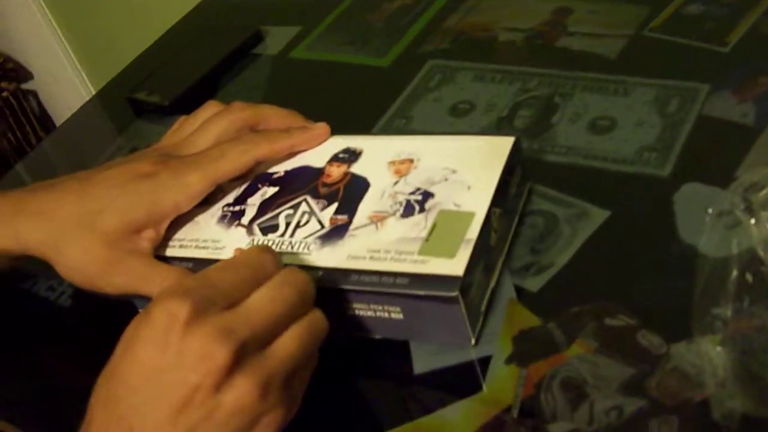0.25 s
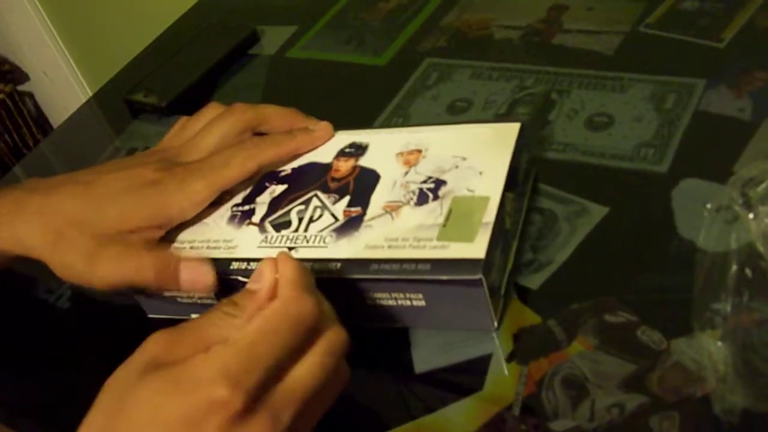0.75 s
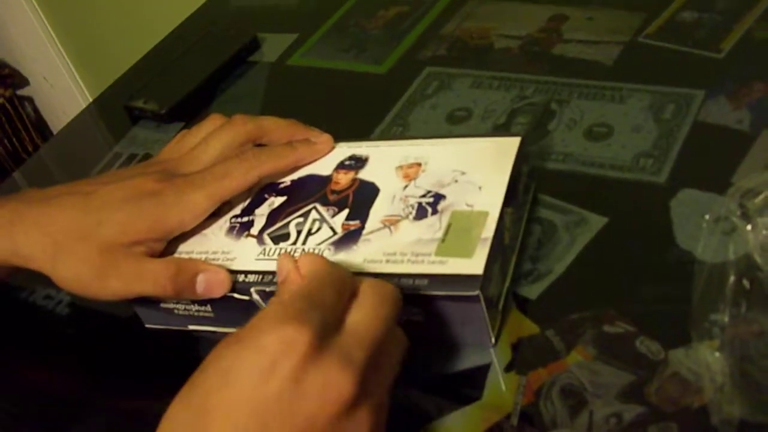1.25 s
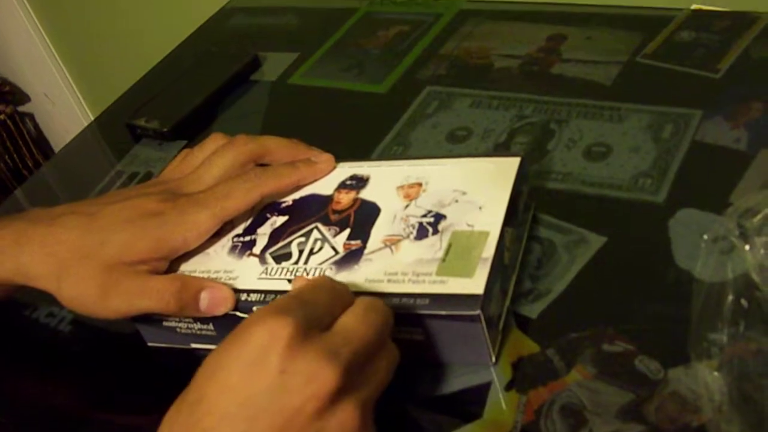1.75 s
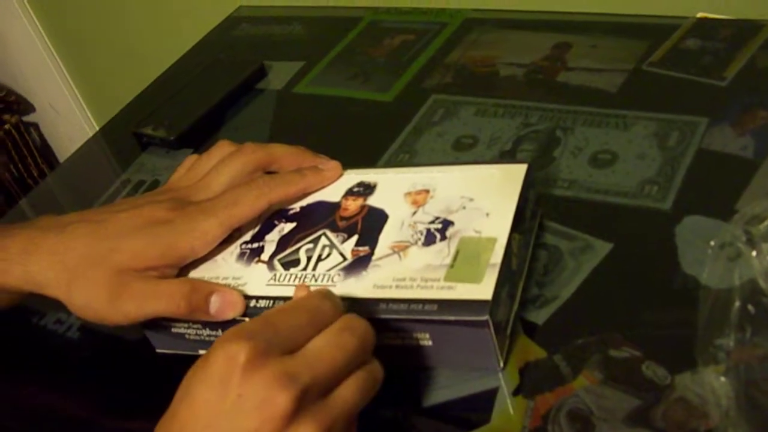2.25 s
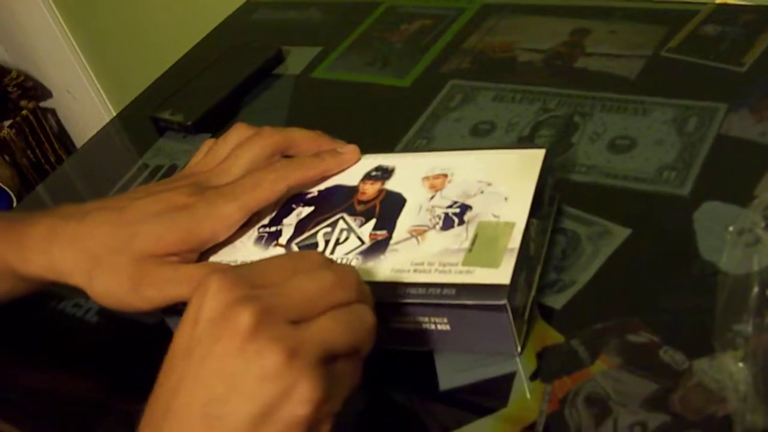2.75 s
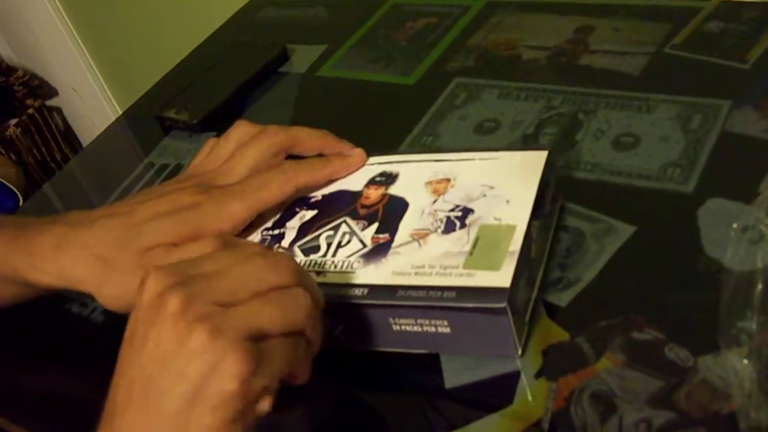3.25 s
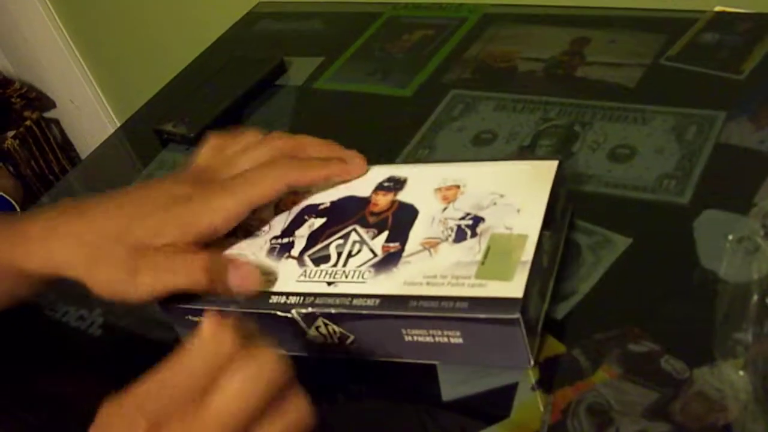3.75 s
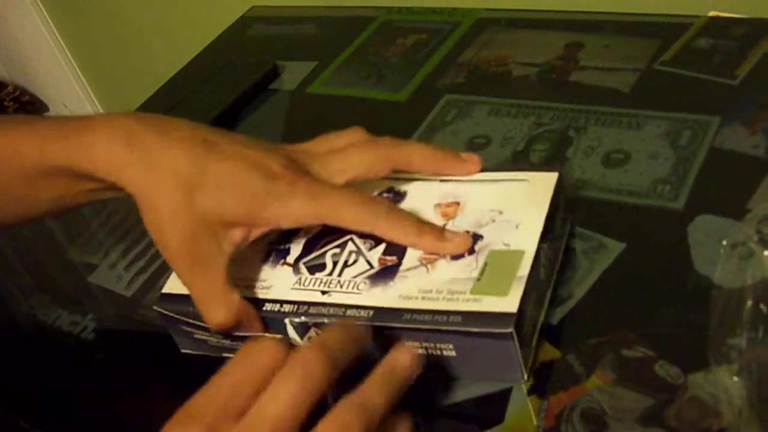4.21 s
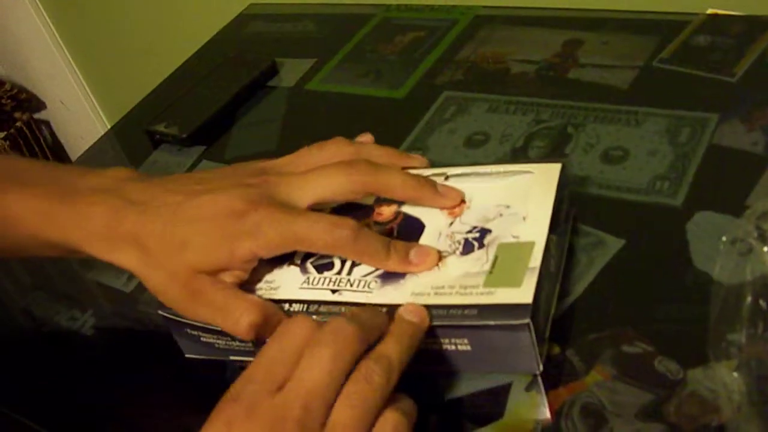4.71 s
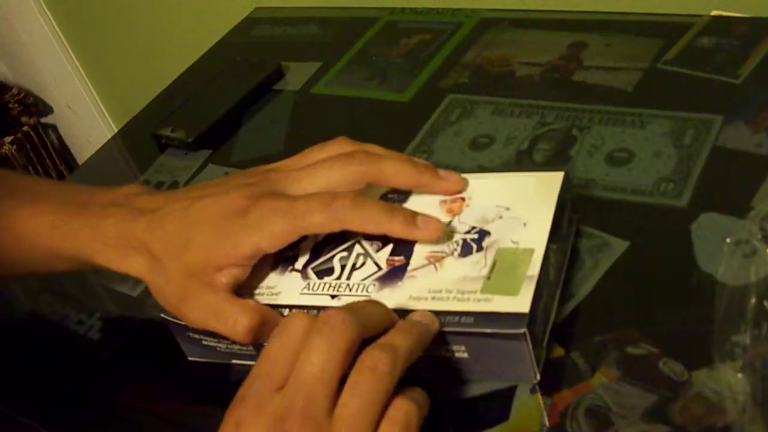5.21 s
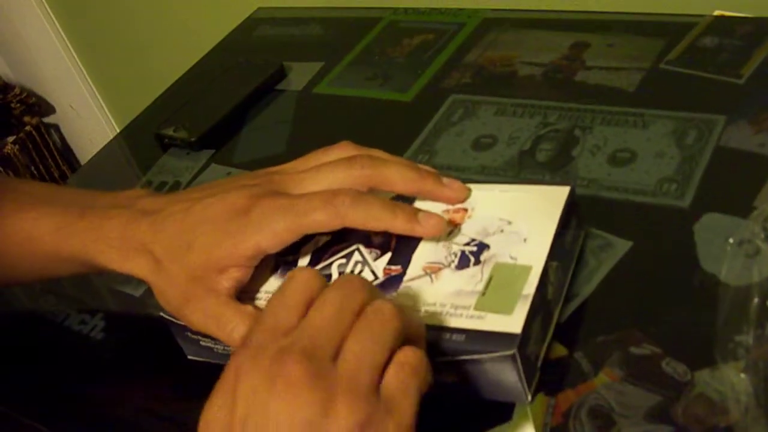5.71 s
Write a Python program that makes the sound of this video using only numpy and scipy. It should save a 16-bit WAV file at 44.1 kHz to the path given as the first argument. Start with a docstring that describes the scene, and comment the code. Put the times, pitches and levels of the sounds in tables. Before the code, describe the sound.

Fingernails pick at a sealed cardboard box in sharp, hollow clicks and short scrapes, with pauses and faint background hiss.

```python
"""A house murmurs under a camera's hiss and two thin whistles. Close by, fingernails pick at the sealed
edge of a small cardboard box, ringing its hollow panels and the table; a small room answers. The first tap
(0.2 s) is trailed by a short low tone, then a hard flick, rubbing fingers and thinning ticks. After a lull
the rubbing returns (2.4 s) and the picking builds to sharp flicks at 3.4 and 4.5 s, then eases into light
ticks and strokes."""
import sys
import numpy as np
from scipy import signal
from scipy.fft import rfft, irfft, next_fast_len
from scipy.io import wavfile
from scipy.ndimage import map_coordinates

SR = 44100
rng = np.random.default_rng(int(sys.argv[2]) if len(sys.argv) > 2 else 0)


def dump(signal):
    """Clip the signal to [-1, 1] and save it as 16-bit WAV at the path in sys.argv[1]."""
    limited = np.clip(np.atleast_2d(signal).T, -1, 1)
    pcm = np.round(limited * 32767).astype(np.int16)
    wavfile.write(sys.argv[1], SR, pcm)


N = 263354


def amp(db):
    return 10 ** (np.asarray(db) / 20)


def unit_rms(x):
    return x / np.sqrt(np.mean(x ** 2) + 1e-20)


def curve(points, hz):
    """Read (frequency, value) breakpoints on a log frequency axis."""
    freqs, values = np.transpose(points)
    return np.interp(np.log(hz + 1), np.log(freqs + 1), values)


def wobble(rate):
    """A smooth random modulator, rate knots a second."""
    return map_coordinates(rng.standard_normal(int(N * rate / SR) + 4), [np.arange(N) * rate / SR])


def filtered(x, response):
    """Pass x through a complex frequency response."""
    size = next_fast_len(x.shape[-1] + SR // 10)
    return irfft(rfft(x, size) * response(np.fft.rfftfreq(size, 1 / SR)), size)[..., :x.shape[-1]]


def resonators(modes, hz):
    """The response of parallel band-pass resonances, alternating in polarity."""
    return sum((-1) ** k * amp(db) * 1j * hz * width / (centre ** 2 - hz ** 2 + 1j * hz * width)
               for k, (centre, width, db) in enumerate(modes))


def stereo(x, correlation):
    """Mix two unrelated signals as mid and side to set the width at each frequency."""
    angle = lambda hz: np.arccos(np.clip(curve(correlation, hz), -1, 1)) / 2
    mid, side = filtered(x, lambda hz: np.array([np.cos(angle(hz)), np.sin(angle(hz))]))
    return np.array([mid + side, mid - side])


# Colour of the house murmur and camera hiss: (frequency [Hz], relative level [dB])
BED_SPECTRUM = [(12, -45), (20, -9), (55, -1.5), (87, -13.5), (103, -11), (257, -15), (331, -16.5),
                (448, -19), (761, -22), (821, -22), (1030, -25), (2430, -29.5), (8400, -42), (10900, -62.5),
                (18500, -120)]
# Stereo width of the bed: (frequency [Hz], left-right correlation [-1..1])
BED_CORRELATION = [(60, 0.52), (160, 0.11), (440, 0.3), (1180, 0.14), (3170, -0.14), (8560, 0.21)]
# Balance of the bed: (frequency [Hz], left minus right [dB])
BED_PAN = [(60, -0.5), (160, 0), (440, 0.0), (1180, 0.5), (3170, 0.5), (8560, 3)]
def noise_bed(level_db=-54.5, drift_db=0.26):
    """The low murmur of the house and the camera's hiss: smooth noise whose level drifts a little."""
    colour = lambda hz: amp(curve(BED_SPECTRUM, hz) + np.outer([.5, -.5], curve(BED_PAN, hz)))
    noise = filtered(stereo(rng.standard_normal((2, N)), BED_CORRELATION), colour)
    return amp(level_db + drift_db * wobble(6.5)) * unit_rms(noise)


# The camera's own tones: (pitch [Hz], rms level [dB])
WHISTLES = [(7827, -86), (8172, -91)]
def camera_whistles():
    """Two thin, steady sines from the camera."""
    return sum(np.sqrt(2) * amp(db) * np.sin(2 * np.pi * hz * np.arange(N) / SR) for hz, db in WHISTLES)


# Nail hits: (time [s], knock [dB], thud [dB], ring [dB], crack [dB],
#             knock pitch [Hz], ring pitch [Hz], blip against the ringing [dB])
NAIL_HITS = [(0.2165, -28.5, -36, -35.5, -57, 483, 1400, -6), (0.347, -67, -71, -59, -45, 440, 1670, -11),
             (0.3529, -68, -54, -53, -40, 513, 1660, -11),
             (0.3916, -19.5, -21.5, -17.5, -24.5, 655, 1470, -10),
             (0.3952, -9, -28, -9, -42, 623, 1090, 3.5), (0.4327, -45, -37, -21, -56, 700, 1970, -6),
             (0.4613, -21, -35.5, -46, -41, 518, 1410, -3.5),
             (0.6108, -58, -72, -48, -44.5, 500, 1430, -14), (0.7327, -49, -74, -46, -60, 650, 1580, -4),
             (0.7948, -45, -67, -45.5, -47, 546, 1470, -6),
             (0.8335, -46.5, -52, -49.5, -51, 545, 1100, -11.5),
             (0.9029, -43.5, -46, -36.5, -44, 636, 1340, -7.5), (1.0917, -39, -69, -68, -66, 404, 1440, -9),
             (1.3425, -40.5, -63, -37, -75, 620, 1250, -11.5), (1.719, -76, -80, -68, -50, 700, 1680, -3),
             (2.7892, -20.5, -41, -27.5, -29.5, 660, 1194, 5), (2.824, -30.5, -50, -45, -57, 694, 1270, -3),
             (2.8472, -27.5, -43, -36, -30.5, 770, 1130, -8), (2.8547, -28, -31, -35, -42, 630, 1050, -8),
             (2.9921, -43, -72, -43.5, -63, 730, 1260, -6), (3.0621, -48.5, -72, -58, -64, 605, 1280, -6),
             (3.4188, -24, -34, -32, -59, 640, 1180, -15), (3.4251, -13, -25.5, -16, -23.5, 586, 1130, -13),
             (3.7111, -50, -72, -44, -58, 650, 1330, -12), (3.7454, -45, -54.5, -47, -48, 580, 1170, -13),
             (3.7741, -34.5, -43.5, -32, -32.5, 580, 1280, -12),
             (3.8096, -57, -45, -40, -63, 710, 1420, -8), (4.0383, -26.5, -31, -54, -56, 534, 1200, -4.5),
             (4.045, -28.5, -48, -31.5, -62, 690, 1430, -6),
             (4.0712, -52, -41, -34.5, -37.5, 640, 1280, -6),
             (4.2569, -43, -66, -45, -53, 580, 1300, -14.5),
             (4.3136, -52.5, -63, -36.5, -39, 694, 1630, -8),
             (4.3291, -53, -62, -24.5, -26.5, 700, 1630, 2), (4.3445, -52, -49.5, -35, -55, 580, 1500, -10),
             (4.3904, -47, -63, -46, -55, 610, 1250, -3),
             (4.4228, -36.5, -58, -27.5, -36, 780, 2270, -16.5),
             (4.4568, -12.5, -29.5, -10.5, -45, 683, 1710, -7),
             (4.4584, -24.5, -38.5, -11, -24, 650, 1890, -7.5),
             (4.4628, -12, -26, -13.5, -16, 574, 1350, -10.5),
             (4.6011, -50, -64, -35.5, -62.5, 644, 1420, -7),
             (4.6097, -34, -52, -33.5, -59, 600, 1480, -11), (4.685, -48.5, -71, -44, -47, 593, 1360, -11),
             (4.7308, -41.5, -60, -34, -33, 600, 1510, -14), (4.7336, -28.5, -47, -26, -37.5, 665, 980, 3),
             (4.9011, -54, -71, -40.5, -63, 557, 1910, -3), (5.0182, -52.5, -64, -49, -49, 680, 1530, -10),
             (5.1017, -47.5, -67, -42, -45, 596, 1430, -7.5), (5.245, -70, -51, -38.5, -65, 720, 1300, -16),
             (5.2561, -40, -57, -67, -63, 490, 1120, -5), (5.6148, -46, -40, -43.5, -59, 535, 1180, -6.5),
             (5.6232, -40.5, -50, -40, -49, 688, 1080, -5.5), (5.8332, -49, -63, -39, -25, 601, 1890, -5),
             (5.8365, -64, -67, -41, -39, 601, 1870, -2)]
def nail_picks(rise_s=0.00047, send_db=1.5):
    """Each hit is a sharp push that chatters out; returns the direct sound and its reverb."""
    size = SR // 8
    t = np.arange(size) / SR
    push = t == 0
    direct, reverb = np.zeros(N + SR), np.zeros((2, N + SR))
    for time_s, *layers_db, knock_hz, ring_hz, blip_db in NAIL_HITS:
        ring_db, crack_db = layers_db[2:]
        contact_s = np.clip(0.004 + 0.012 * amp(crack_db + 23), 3e-4, .1)  # hard cracks chatter longer
        chatter = (1 - np.exp(-t / rise_s)) * amp(-60 * t / contact_s) * rng.standard_normal(size)
        # the crack climbs up to 0.69 octave as it stands out over the ring
        crack_hz = 3670 * 2 ** (0.69 * np.clip((crack_db - ring_db) / 11.5, 0, 1))
        close, sends = hit_layers(push, chatter, knock_hz, ring_hz, crack_hz, blip_db)
        start = round(time_s * SR)
        direct[start:start + size] += amp(layers_db) @ close
        tail = amp(send_db) * room_reverb(amp(layers_db) @ sends, size=2 * size)
        reverb[:, start:start + tail.shape[1]] += tail
    return direct[:N], reverb[:, :N]


# Panels of the hollow box: (pitch [Hz], bandwidth [Hz], level [dB])
BOX_MODES = [(405, 100, -8.5), (581, 26, 5), (730, 58, -5.5), (839, 31, 2.5), (966, 95, -5.5),
             (1170, 75, -6.5), (1360, 310, -19), (1680, 35, -7.5), (2035, 52, -13), (2704, 80, -15.5)]
# Table top under the box: (pitch [Hz], bandwidth [Hz], level [dB])
TABLE_MODES = [(113.3, 22, -11), (206, 38, -6), (298, 56, -6.5)]
# Broad crack of nail on card edge: (pitch [Hz], bandwidth [Hz], level [dB])
NAIL_MODES = [(2510, 1800, 0), (4070, 1570, -4), (5320, 1700, -8), (7700, 2400, -16.5)]
def hit_layers(push, chatter, knock_hz, ring_hz, crack_hz, blip_db):
    """One hit rings panels, table and nail: four close layers of peak 1 and their reverb sends."""
    low_panels = [mode for mode in BOX_MODES if mode[0] < 900]
    high_panels = [mode for mode in BOX_MODES if mode[0] >= 900]
    # (modes, focus [Hz], high cut [x focus], low cut [x focus], slope [dB/oct], chatter gain, blip [dB])
    layers = ((low_panels, knock_hz, 2.6, .3, 15, .08, blip_db),  # knock
              (TABLE_MODES, 190, 2.8, .25, 15, .1, blip_db),  # thud
              (high_panels, ring_hz, 2.1, .45, 15, .2, blip_db - 5),  # ring
              (NAIL_MODES, crack_hz, 3.2, .45, 7, .7, -24))  # crack
    close, sends = [], []
    for modes, focus_hz, high_cut, low_cut, slope, chatter_gain, jump_db in layers:
        # each spot favours the modes near one pitch; the panel's first jump is a broad blip there
        spot = [(hz, width, db - slope * abs(np.log2(hz / focus_hz)) + 1.9 * rng.standard_normal())
                for hz, width, db in modes]
        blip = [(focus_hz, 0.76 * focus_hz, jump_db)]

        def response(hz):
            jw = 1j * hz / focus_hz
            fingertip = jw / (low_cut + jw) / (1 + jw / high_cut) ** 3  # neither instant nor lasting
            return (resonators(spot, hz) + resonators(blip, hz)) * fingertip

        rough, smooth = filtered(np.array([push + chatter_gain * chatter, push]), response)
        close.append(rough / np.abs(rough).max())
        # over all directions the chatter's colour evens out: the room gets the same energy, smooth
        sends.append(smooth * np.linalg.norm(close[-1]) / np.linalg.norm(smooth))
    return np.array(close), np.array(sends)


# Decay of the small room: (frequency [Hz], time to fall 60 dB [s])
ROOM_DECAY = [(100, 0.57), (300, 0.3), (700, 0.22), (1800, 0.29), (5000, 0.26), (9000, 0.35)]
# Stereo width of the tail: (frequency [Hz], left-right correlation [-1..1])
ROOM_CORRELATION = [(100, 0.92), (500, 0.99), (1500, 0.33), (4000, 0.23)]
def room_reverb(x, size, attack_s=0.00067):
    """The walls answer with a fresh noise tail, each frequency dying at its own speed."""
    hz, t, spectra = signal.stft(rng.standard_normal((2, size)), SR, nperseg=256)
    decay = amp(-60 * t / curve(ROOM_DECAY, hz)[:, None])
    tail = signal.istft(spectra * decay, SR, nperseg=256)[1][:, :size]
    fade_in = 1 - np.exp(-np.arange(size) / SR / attack_s)
    tail = stereo(tail * fade_in, ROOM_CORRELATION)
    return signal.fftconvolve(x[None], tail / np.linalg.norm(tail[0]), axes=1)


def low_tone(start_s=.22, length_s=.15, attack_s=.007, release_s=.02, pitch_hz=304, level_db=-58):
    """A short low sine swells in after the first tap and stops."""
    t = np.arange(N) / SR - start_s
    gate = np.interp(t, [0, attack_s, length_s - release_s, length_s], [0, 1, 1, 0])
    return np.sqrt(2) * gate * amp(level_db) * np.sin(2 * np.pi * pitch_hz * t)


# Fingers sliding over the card: (start [s], peak [s], end [s], body [dB], hiss [dB])
STROKES = [(0.424, 0.43, 0.62, -45.5, -58.5), (0.54, 0.59, 1.08, -71, -68.5),
           (2.422, 2.574, 2.74, -68, -67), (2.775, 2.81, 2.95, -45.5, -60), (2.983, 3.008, 3.134, -53, -81),
           (3.445, 3.438, 3.615, -42, -51), (3.575, 3.718, 3.88, -55.5, -56),
           (3.742, 3.813, 3.94, -60, -58.5), (4.031, 4.044, 4.25, -47.5, -57),
           (4.166, 4.225, 4.55, -54.5, -62), (4.33, 4.345, 5, -58, -81.5),
           (4.581, 4.606, 4.64, -45.5, -57.5), (4.744, 4.75, 4.92, -52.5, -65.5),
           (4.832, 4.962, 5.28, -59.5, -78), (5.058, 5.096, 5.07, -53.5, -74),
           (5.234, 5.242, 5.41, -57, -89), (5.54, 5.59, 5.86, -61.5, -77)]
# Hiss of skin on card: (frequency [Hz], relative level [dB])
SKIN_SPECTRUM = [(1060, -35.5), (1800, -19), (2080, -20), (2320, -4.5), (3860, -8), (6660, -15),
                 (8800, -23), (11400, -75.5), (19400, -120)]
def finger_rubs():
    """Skin sticks and slips: dense grains shake the panels and hiss, swelling with each stroke."""
    def damped_box(hz):
        panels = resonators(BOX_MODES, hz)
        return panels / (np.abs(panels) + 0.087) ** 0.74  # the hand damps the peaks

    grains = rng.standard_normal(N) * amp(2.5 * wobble(300) + 1.2 * wobble(60))
    body = unit_rms(filtered(grains, damped_box))
    hiss = unit_rms(filtered(grains, lambda hz: amp(curve(SKIN_SPECTRUM, hz))))
    out = np.zeros(N)
    for start, peak, end, body_db, hiss_db in STROKES:
        swell = np.interp(np.arange(N) / SR, [start, peak, end], [0, 1, 0]) ** 1.72
        out += swell * (amp(body_db) * body + amp(hiss_db) * hiss)
    return out


# EQ on the reverb return: (frequency [Hz], gain [dB])
REVERB_EQ = [(100, -9), (400, -9), (1000, -4.5), (2500, -6), (5000, -5), (8500, -9)]
# Balance at the camera's two microphone ports: (frequency [Hz], left minus right [dB])
PORT_PAN = [(100, 1.5), (500, 1.5), (1200, 1.7), (2500, -1.5), (4500, 6.5), (8000, 13.5)]
def microphone_ports(direct, reverb, right_lag_s=.00009):
    """The camera body shades one port; the direct sound reaches the right one later."""
    sides = np.array([[.5], [-.5]])
    close = filtered(np.array([direct, direct]), lambda hz: np.exp(2j * np.pi * hz * sides * right_lag_s))
    wet = filtered(reverb, lambda hz: amp(curve(REVERB_EQ, hz)))
    return filtered(close + wet, lambda hz: amp(sides * curve(PORT_PAN, hz)))


def scene():
    """Picks, low tone and rubs in the small room, over the noise bed."""
    picks, pick_reverb = nail_picks()
    sustained = low_tone() + finger_rubs()
    reverb = pick_reverb + room_reverb(sustained, size=SR // 4)[:, :N]
    return microphone_ports(picks + sustained, reverb) + noise_bed()


# The camera's treble roll-off: (frequency [Hz], gain [dB])
CAMERA_EQ = [(7000, 1), (8000, -2.5), (8500, -13), (8900, -23.5)]
BAND_LIMIT_HZ = 8900
def record(dry):
    """The camera rolls off the treble, adds its whistles and passes nothing above its band limit."""
    heard = filtered(dry, lambda hz: amp(curve(CAMERA_EQ, hz))) + camera_whistles()
    return filtered(heard, lambda hz: hz < BAND_LIMIT_HZ)


dry = scene()
out = record(dry)
dump(out)
```